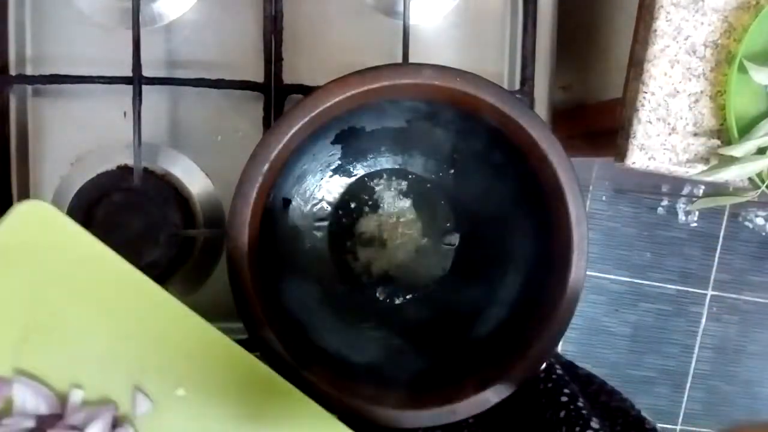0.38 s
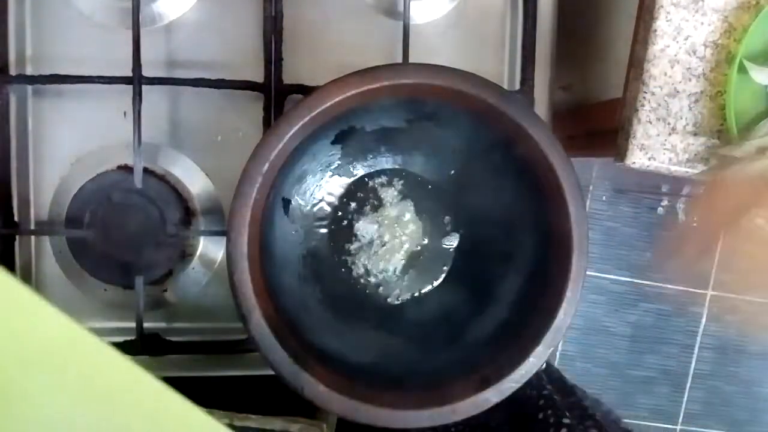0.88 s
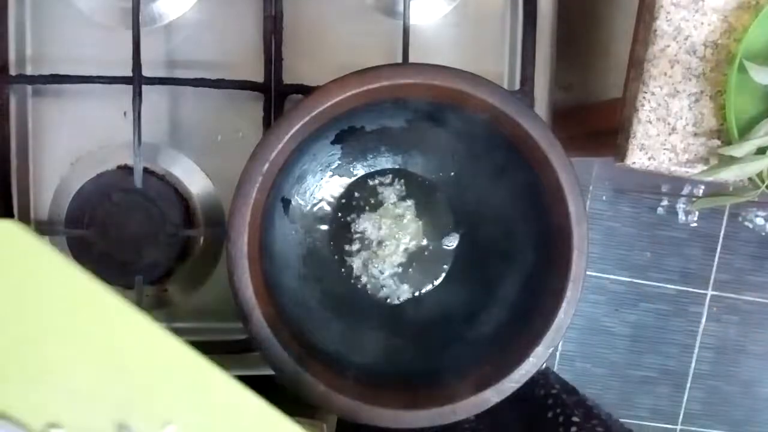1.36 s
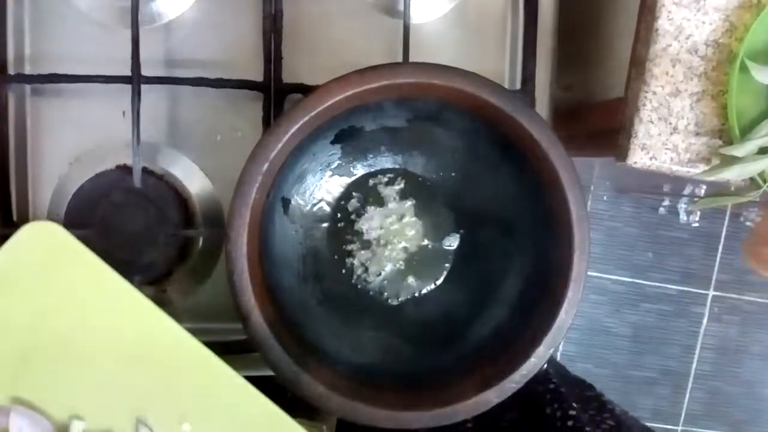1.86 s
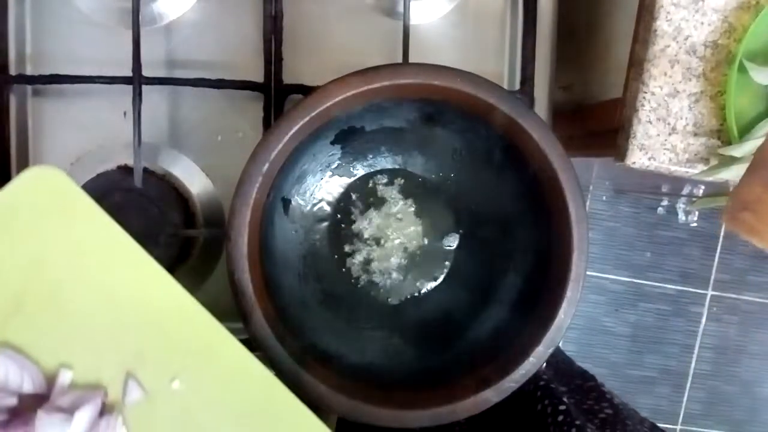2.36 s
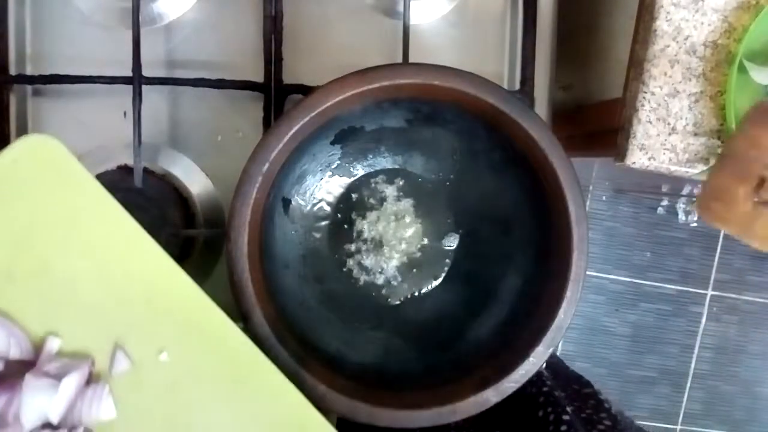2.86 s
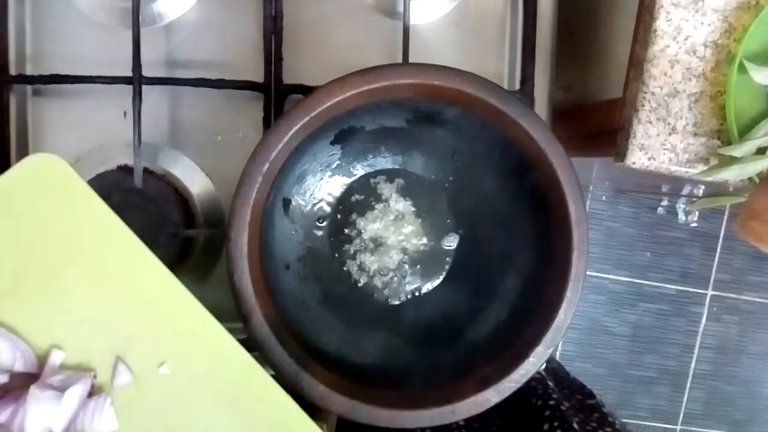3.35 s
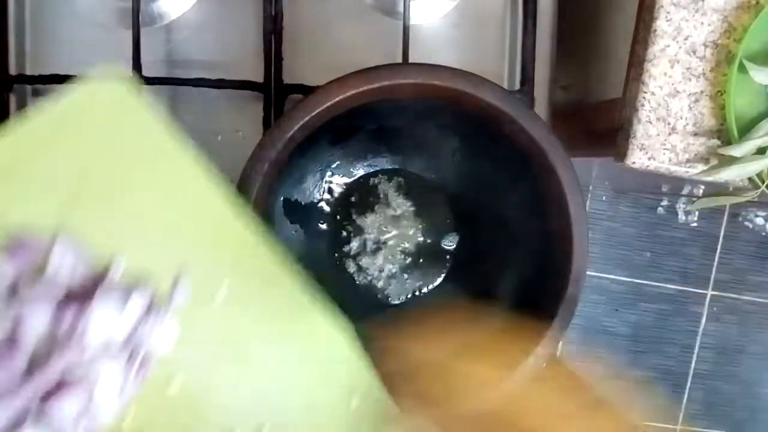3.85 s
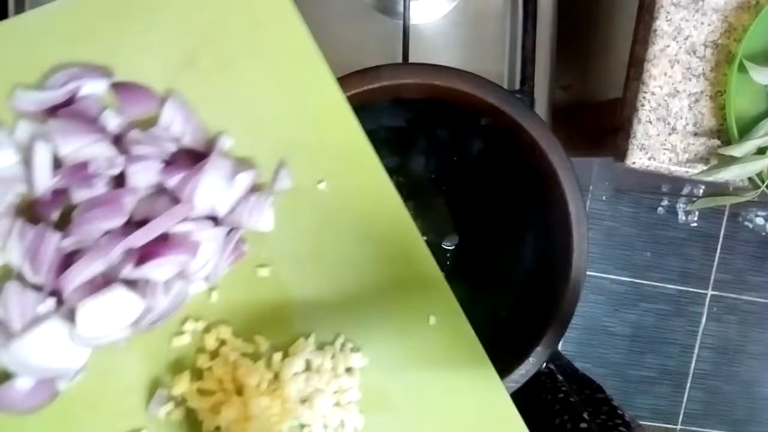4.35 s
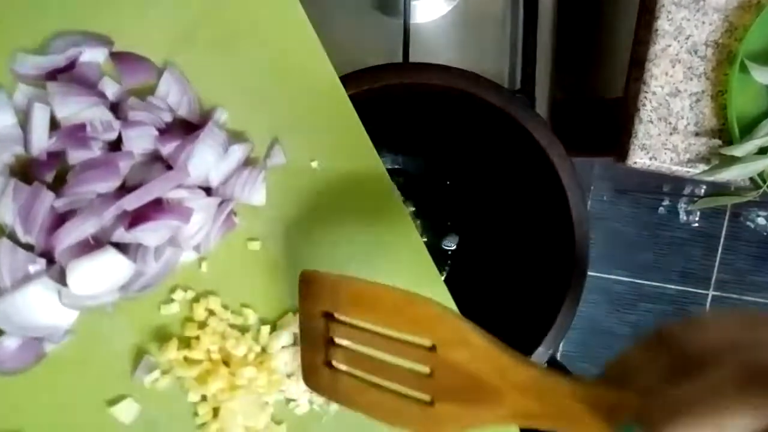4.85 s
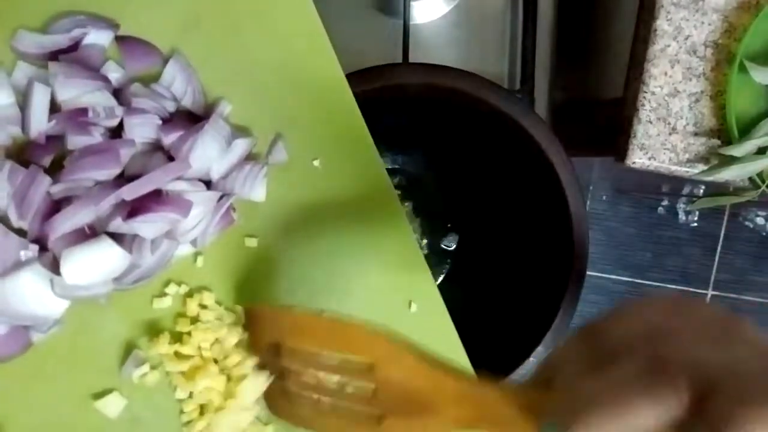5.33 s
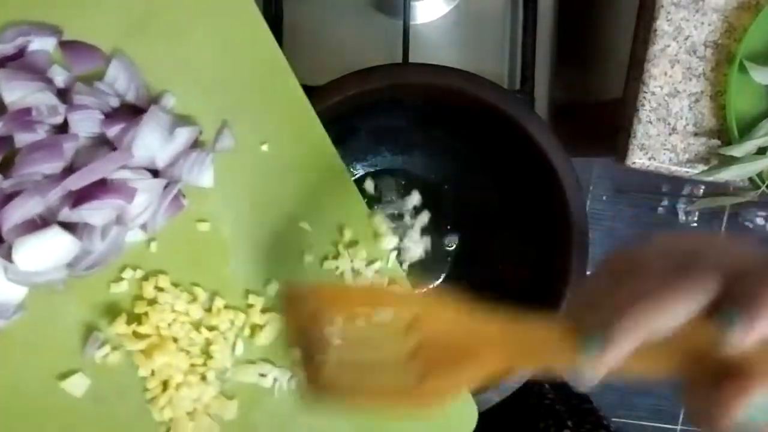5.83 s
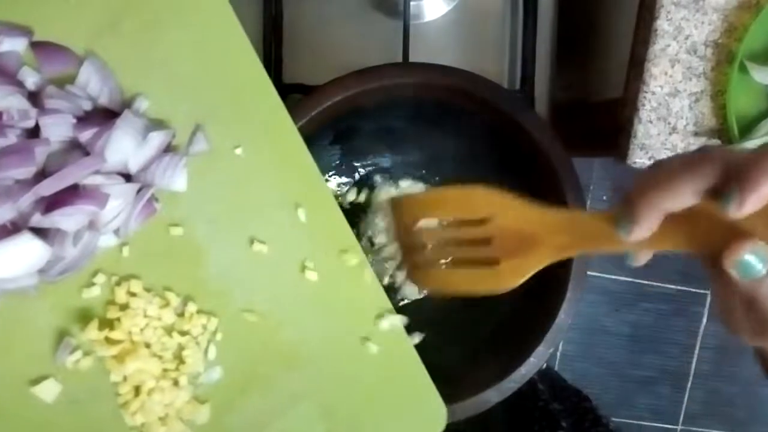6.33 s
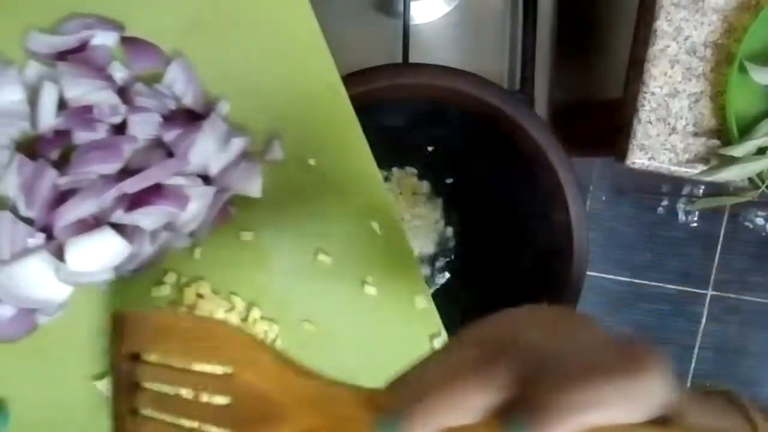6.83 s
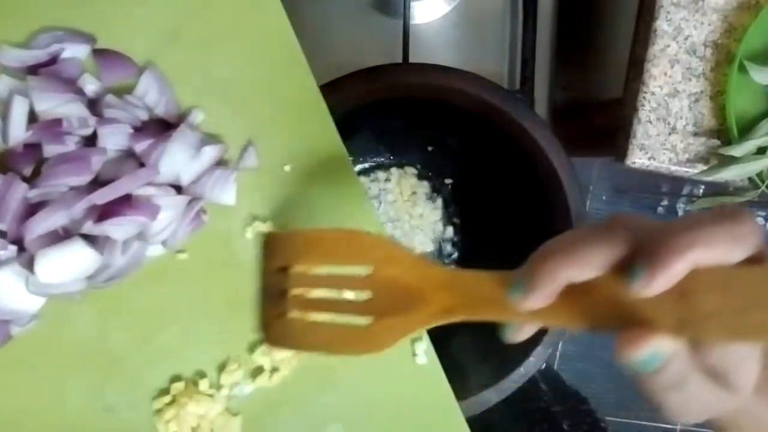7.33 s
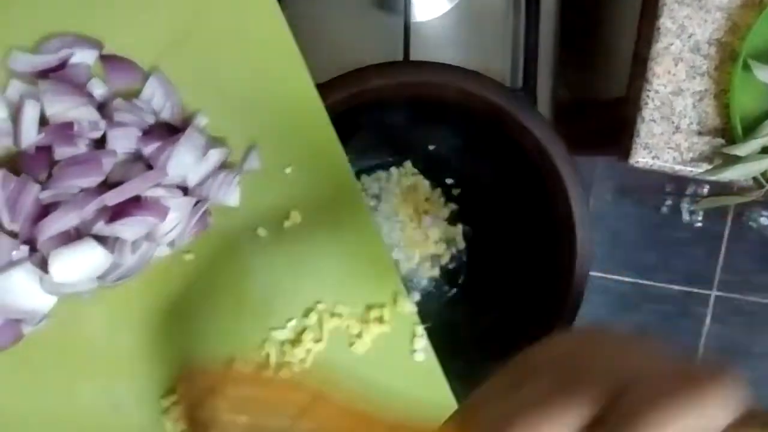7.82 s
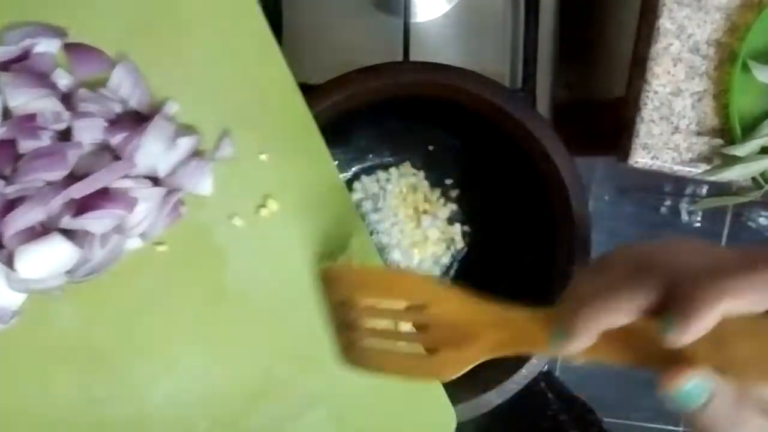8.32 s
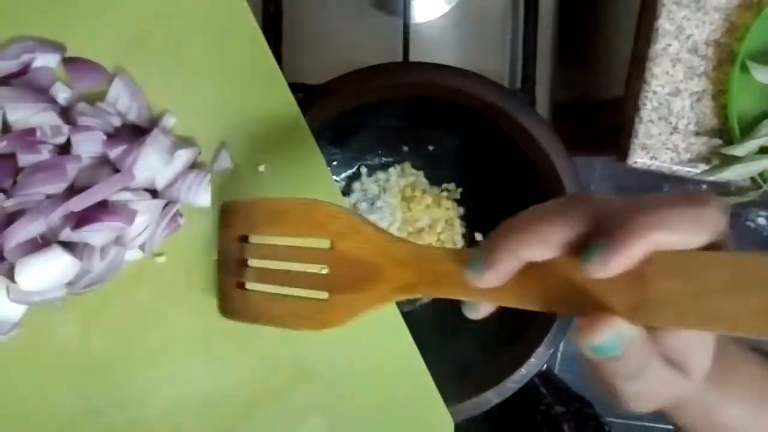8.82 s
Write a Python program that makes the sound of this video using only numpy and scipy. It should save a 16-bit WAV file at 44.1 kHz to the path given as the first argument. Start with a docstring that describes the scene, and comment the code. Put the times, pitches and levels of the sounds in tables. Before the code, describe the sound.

In a home kitchen, mustard seeds burst irregularly in hot oil, each a bright pitched pop with a crack and slight clay ring. Around six seconds wet chopped garlic and ginger drop in, and hissing sizzle surges in bursts with sharp oil spits. A wooden spatula taps and softly rubs a plastic board. Low fan and mains hum and a faint gas flame sit behind, through a close phone microphone with edgy treble.

```python
"""Mustard seeds in hot oil

Mustard seeds burst one by one in a clay pot, each a pitched steam bubble with a crack and a puff of air.
Then wet chopped garlic and ginger make the oil sizzle and spit, in swells of crackling noise.
A wooden spatula taps and rubs a plastic board. Fan tones, mains hum and a gas flame's shaped noise lie
behind, heard through a phone microphone with a sharp treble resonance."""
import sys
import numpy as np
from scipy import signal
from scipy.fft import rfft, irfft, next_fast_len
from scipy.io import wavfile
from scipy.ndimage import uniform_filter1d, map_coordinates

SR = 44100
rng = np.random.default_rng(int(sys.argv[2]) if len(sys.argv) > 2 else 0)


def how_loud(loudness_db):
    """Turn decibels into a plain amplitude multiplier (0 dB gives 1, 20 dB gives 10)."""
    steps = np.asarray(loudness_db, float) / 20
    return 10 ** steps


def log_audio(samples):
    """Write samples as a 16-bit WAV file to the path given in sys.argv[1]."""
    # one column per channel
    frames = np.atleast_2d(samples).T
    # limit to full scale, then quantise
    limited = np.clip(frames, -1, 1)
    pcm = np.round(limited * 32767).astype(np.int16)
    wavfile.write(sys.argv[1], SR, pcm)


N = 394254


def unit(x):
    """Scaled to rms 1 along time."""
    return x / np.sqrt(np.mean(x ** 2, axis=-1, keepdims=True) + 1e-20)


def along(points, hz):
    """Reads a curve of (Hz, value) points on a log frequency axis."""
    f, v = np.transpose(points)
    return np.interp(np.log(hz + 1), np.log(f + 1), v)


def wobble(rate):
    """A smooth random curve with rate knots a second."""
    knots = rng.standard_normal(int(N * rate / SR) + 4)
    return map_coordinates(knots, [np.arange(N) * rate / SR])


def filtered(x, response):
    """Passes x through a complex response of frequency."""
    n = x.shape[-1]
    m = 2 * next_fast_len(n // 2 + 4096)
    return irfft(rfft(x, m) * response(np.fft.rfftfreq(m, 1 / SR)), m)[..., :n]


def causal(gain):
    """The minimum-phase response with this gain, from its folded cepstrum."""
    c = irfft(np.log(gain + 1e-6))
    c[1:len(c) // 2] *= 2
    c[len(c) // 2 + 1:] = 0
    return np.exp(rfft(c))


def resonance(f, hz, width_hz):
    """One causal resonance of peak gain 1."""
    return 1j * f * width_hz / (hz * hz - f * f + 1j * f * width_hz + 1e-9)


def placed(times, rows):
    """Lays each row of sound down at its time in seconds."""
    at = np.round(np.asarray(times) * SR).astype(int)[:, None] + np.arange(rows.shape[1])
    return np.bincount(at.ravel(), rows.ravel(), N + SR)[:N]


def crackle(per_s, spread_db, life_s):
    """Tiny bursts at random: short puffs of noise, most small and a few large, rms 1."""
    bursts = rng.random(N) < per_s / SR
    size = bursts * how_loud(spread_db * np.minimum(rng.exponential(size=N), 4))
    puff = np.exp(-np.arange(SR // 100) / (SR * life_s))
    return unit(signal.fftconvolve(size, puff)[:N] * rng.standard_normal(N))


def swell(s, db, rise_s, fall_db_per_s):
    """Gain of one event: up 20 dB over rise_s to its top at s, then a steady fall in dB."""
    t = np.arange(N) / SR - s
    return how_loud(db + np.where(t < 0, 20 * t / max(rise_s, .002), -fall_db_per_s * t))


def together(gains):
    """Unrelated sounds add in power."""
    return np.sqrt(sum(g ** 2 for g in gains))


# Bursting seeds and drops. Each row: start in seconds, level in dB, steam bubble pitch in Hz,
# crack level in dB.
SEED_POPS = [(0.004, -22.5, 2270, -5), (0.212, -31, 5200, -10), (0.2227, -9, 3100, -16.5),
             (0.3224, -23.5, 2450, -11), (0.403, -32.5, 2920, -21), (0.4761, -18, 4070, -17),
             (0.614, -12, 2390, -14.5), (0.823, -9.5, 2100, -15.5), (0.9014, -31, 2170, -6),
             (0.996, -16.5, 2720, -20), (1.045, -14.5, 3100, -19), (1.1512, -22.5, 3000, -17),
             (1.1884, -36.5, 2640, -3), (1.266, -30.5, 2150, -9.5), (1.4343, -12, 2600, -17.5),
             (1.527, -15.5, 2900, -15), (1.5988, -29.5, 2150, -13), (1.8739, -25.5, 5830, -18),
             (1.983, -10.5, 2000, -13), (2.1219, -18, 2750, -17), (2.155, -21.5, 2680, -8),
             (2.377, -9.5, 2390, -19.5), (2.4585, -24, 2820, -25), (2.5447, -12.5, 2000, -13),
             (2.589, -18.5, 2780, -8), (2.7313, -16.5, 2220, -8.5), (2.811, -13.5, 2750, -17),
             (2.9278, -17, 2500, -16.5), (3.0394, -24.5, 5830, -22), (3.0757, -17, 1890, -15),
             (3.135, -21, 4020, -14), (3.1822, -14.5, 2620, -11.5), (3.274, -26.5, 2090, -18),
             (3.3908, -36, 2690, -22), (3.4291, -38, 4230, -3), (3.5573, -32, 4640, -12.5),
             (3.6096, -12, 2340, -9), (3.888, -28.5, 3050, -5.5), (4.0955, -18, 1980, -10),
             (4.2779, -23, 2530, -2.5), (4.3209, -16, 3030, -18), (4.616, -36, 2740, -22),
             (4.726, -10.5, 1920, -12), (5.009, -26.5, 5170, -6), (5.0493, -20, 2900, -19),
             (5.0763, -26.5, 3000, -6), (5.2776, -16.5, 2670, -14.5), (5.3257, -21.5, 2080, -13),
             (5.566, -21.5, 2400, -17), (5.6266, -23, 2760, -19), (5.6955, -16.5, 2620, -8.5),
             (5.7229, -10.5, 1900, -15.5), (5.8267, -17.5, 2550, -14.5), (5.8621, -28, 2940, -9.5),
             (5.9224, -26, 2070, -13.5), (6.1285, -17, 5000, -13), (6.1966, -22.5, 2480, -11),
             (6.292, -23, 5400, -15), (6.7101, -11, 3020, -42.5), (6.774, -12.5, 2120, -15),
             (6.8354, -17, 2130, -19), (7.2619, -18.5, 3870, -21.5), (7.385, -21, 3480, -22),
             (7.435, -19.5, 3600, -19), (7.4598, -21, 5830, -13), (7.5123, -11.5, 5830, -13),
             (7.7528, -18.5, 3760, -11.5), (7.775, -18, 3300, -20), (7.8, -17, 3900, -20),
             (7.825, -19, 3300, -20), (7.92, -25, 2200, -22), (8.158, -18, 5260, -14.5),
             (8.2476, -15, 5470, -19), (8.309, -28, 3350, -5), (8.3814, -18.5, 5300, -11)]
# Pops that throw a fine spray. Each row: time of the pop in seconds, level of its air puff in dB.
SPRAY_PUFFS = [(0.004, -5), (0.2227, -19), (0.614, -13), (0.996, -12), (1.8739, -9), (2.811, -18),
               (4.726, -10), (5.8267, -8), (6.292, -3), (6.7101, -9), (6.774, -8), (7.435, -8),
               (8.158, -10), (8.3814, 3)]


def pops():
    """Steam tears each seed: a pitched bubble and a crack above it, sputtering on as the walls answer."""
    # a few seeds only split, faintly and at random moments
    faint_count, faint_db, faint_hz, faint_crack_db = 8, -41, 3200, -10
    luck = rng.random((faint_count, 4)) - .5
    faint = [N / SR / 2, faint_db, faint_hz, faint_crack_db] + luck * [N / SR - .1, 8, 2500, 16]
    s, db, hz, crack_db = np.vstack([SEED_POPS, faint]).T[:, :, None]

    t60 = .31 + .005 * crack_db  # seconds; a harder crack sputters on longer
    air_db = -31 + 6 * rng.standard_normal(s.shape)  # the topmost puff differs every time
    for at, puff_db in SPRAY_PUFFS:
        air_db[np.argmin(abs(s - at))] = puff_db
    t = np.arange(SR * 2 // 5) / SR
    noise = rng.standard_normal((len(s), 4, len(t)))
    # each spot in the bowl drives the modes differently
    place_db = -1.5 + 3.8 * rng.standard_normal((len(s), len(POT_MODES)))

    sputter = how_loud(2.77 * unit(uniform_filter1d(noise[:, 3], size=40)))  # lumps of about a millisecond
    blast = how_loud(-4.5 - 60 * t / 0.032)
    tail = how_loud(-8 - 60 * t / np.clip(t60, .04, 1))
    opening = 1 - np.exp(-t * hz / 2.34)  # bigger bubbles take longer to open
    shape = opening * (blast + tail)
    size = np.sqrt(np.mean(shape ** 2, axis=1, keepdims=True))

    def above(f):  # little sounds below the bubble's pitch
        return 1j * f / (0.45 * hz + 1j * f)

    def crack_colour(f):
        return above(f) ** 2 * resonance(f, 3000, 11800) / (1 + (f / 13000) ** 4)

    bubble = noise[:, 0] * shape * sputter * how_loud(-60 * t / 1.2)
    bubble = unit(filtered(bubble, lambda f: above(f) * resonance(f, hz, .5 * hz) ** 2))
    crack = unit(filtered(noise[:, 1] * shape * sputter, crack_colour))
    air = noise[:, 2] * shape * how_loud(-60 * t / .5)
    air = unit(filtered(air, lambda f: resonance(f, 13000, 9000) ** 2))
    burst = size * (how_loud(-13.5) * bubble + how_loud(crack_db) * crack + how_loud(air_db) * air)
    rung = filtered(burst, lambda f: bowl(f, place_db))
    return placed(s[:, 0] - .0004, how_loud(db) * rung)


# Sharp spits of oil in the sizzle. Each row: start in seconds, level in dB, air level in dB.
OIL_SPITS = [(6.9764, -1, -24), (7.1814, -13, -23), (7.3382, -17.5, -32), (7.649, -14, -30),
             (7.8655, -14, -31), (7.9773, -16, -31), (8.042, -19, -33), (8.3714, -9, -20),
             (8.4407, -7, -38), (8.5054, -20, -12), (8.706, -2, -27), (8.762, 0, -14), (8.8458, 8, -32),
             (8.8524, -7, -40), (8.8894, -14, -36)]


def spits():
    """A flung droplet of oil: one sharp snap, some with much top, and a short spray after it."""
    s, db, air_db = np.transpose(OIL_SPITS)[:, :, None]
    t = np.arange(SR // 50) / SR
    spray = 0.064 * rng.standard_normal((len(s), len(t))) * how_loud(-60 * t / .008)
    snap = (t == 0) + spray

    def colour(f):
        return resonance(f, 9800, 6000) ** 2 - how_loud(air_db + 19) * resonance(f, 12000, 9000) ** 2

    return placed(s[:, 0], how_loud(db + 7.5) * filtered(snap, colour))


# Spectrum of the fine fizz. Each row: frequency in Hz, relative gain in dB.
FIZZ_COLOUR = [(800, -43), (2000, -26.5), (4000, -9.5), (6000, -0.5), (10000, 5.5), (16000, 1)]


def fine_fizz():
    """Many tiny bursts, duller than the hiss they sit in, rms 1."""
    bursts = crackle(per_s=1500, spread_db=3.3, life_s=.001)
    bursts = unit(filtered(bursts, lambda f: resonance(f, 5470, 6300) ** 2))
    fizz = bursts + 1.37 * rng.standard_normal(N)
    return unit(filtered(fizz, lambda f: how_loud(along(FIZZ_COLOUR, f))))


# Spectrum of the coarser bubbling. Each row: frequency in Hz, relative gain in dB.
BUBBLING_COLOUR = [(500, -23), (1200, -5), (2200, -4.5), (3500, 2.5), (5000, -3), (9000, -11.5)]


def coarse_bubbling():
    """Fewer and longer bursts, more alike in size, over noise, rms 1."""
    bursts = crackle(per_s=900, spread_db=0.5, life_s=0.0031)
    bubbling = bursts + 0.87 * rng.standard_normal(N)
    return unit(filtered(bubbling, lambda f: how_loud(along(BUBBLING_COLOUR, f))))


# Faint fizz under the seeds. Each row: time in seconds, level in dB.
SEED_SIMMER = [(0.0, -48), (0.82, -55.5), (1.07, -48), (1.25, -56.5), (1.84, -53.5), (2.99, -50),
               (3.68, -51), (4.76, -55.5), (5.55, -50.5), (5.9, -53)]
# Wet food lands in the oil. Each row: time in seconds, steam level in dB, steam fade in dB per second.
FOOD_LOADS = [(5.98, -32, 17), (6.49, -25, 15), (7.757, -25.5, 7)]
# Short swells of fizz and bubbling; the first is a faint low noise at the start. Each row: time of the
# top in seconds, fizz level in dB, swell time in seconds, bubbling level in dB against the fizz.
SHORT_SWELLS = [(0.0, -60, .01, 14), (5.83, -43, .03, -1), (6.035, -34, .01, -20), (6.13, -31.5, .05, -11),
                (6.3, -37, .05, -12), (6.41, -33, .06, -14), (6.49, -33, .05, -12), (6.63, -31.5, .15, -8),
                (6.72, -32.5, .05, -9), (6.79, -33, .05, -7), (6.86, -32, .1, -8), (6.953, -27, .004, -19),
                (7.09, -34, .01, -17), (7.15, -30, .08, -17), (7.35, -32, .04, -17), (7.46, -31, .02, -24),
                (7.513, -28, .003, -26), (7.78, -32.5, .03, -5), (7.87, -33, .1, -9), (7.99, -32, .1, -14),
                (8.07, -31.5, .1, -14), (8.25, -30, .01, -20), (8.39, -30.5, .04, -12),
                (8.44, -33, .03, -12), (8.52, -35, .03, -8), (8.64, -33, .06, -9), (8.7, -27, .1, -12),
                (8.765, -27.5, .04, -10), (8.85, -28, .01, -9), (8.92, -34, .04, -9)]


def frying():
    """Fizz, bubbling and steam of frying, faint under the seeds, strong under wet food, with short swells."""
    land_s, fry_fall_db_per_s, swell_fall_db_per_s = .018, 4.2, 110
    fizz_db, bubbling_db = -8, -20  # steady frying against the landing level of the load
    fry = together(swell(s, db, land_s, fry_fall_db_per_s) for s, db, _ in FOOD_LOADS)
    steam = together(swell(s, db, land_s, fall) for s, db, fall in FOOD_LOADS)
    swells = [swell(s, db, rise_s, swell_fall_db_per_s) for s, db, rise_s, _ in SHORT_SWELLS]
    simmer_s, simmer_db = np.transpose(SEED_SIMMER)
    simmer = how_loud(np.interp(np.arange(N) / SR, simmer_s, simmer_db))

    fizz = together([simmer, how_loud(fizz_db) * fry] + swells)
    fizz = fizz * how_loud(1.1 * wobble(35) + 1.1 * wobble(120))
    swell_bubbling = [how_loud(row[3]) * gain for row, gain in zip(SHORT_SWELLS, swells)]
    bubbling = together([how_loud(bubbling_db) * fry] + swell_bubbling) * how_loud(0.83 * wobble(25))
    hiss = filtered(rng.standard_normal(N), lambda f: resonance(f, 11700, 13000) ** 2)
    return steam * how_loud(1.5 * wobble(12)) * hiss + fizz * fine_fizz() + bubbling * coarse_bubbling()


# Ringing modes of the clay pot. Each row: frequency in Hz, width in Hz, level in dB before the
# drive of the place is added.
POT_MODES = [(1725, 20, -9.5), (1834, 13, -23), (1887, 38, -1), (2088, 36, -4.5), (2210, 63, 1),
             (2580, 20, -9.5), (2874, 23, 0), (2910, 60, 4.5), (3740, 29, -10), (4460, 33, 4.5),
             (5380, 46, 2), (6070, 29, 4.5), (6580, 45, 2)]


def bowl(f, place_db):
    """The clay bowl rings a little on top of whatever bursts in it."""
    ring = sum(how_loud(db + place_db[..., [k]]) * resonance(f, hz, width)
               for k, (hz, width, db) in enumerate(POT_MODES))
    return 1 + ring


def pot(x):
    """Sound from all over the oil drives every mode by the same 3 dB less."""
    return filtered(x, lambda f: bowl(f, np.full(len(POT_MODES), -3)))


# Modes of the plastic board. Each row: frequency in Hz, width in Hz, level in dB.
BOARD_MODES = [(194, 144, -3), (420, 68, 1), (584, 180, -5), (880, 350, -4.5), (1450, 460, -3)]


def board(f):
    """The thin board as a sum of resonances of alternating sign."""
    return sum((-1) ** k * how_loud(db) * resonance(f, hz, width)
               for k, (hz, width, db) in enumerate(BOARD_MODES))


# Spatula taps. Each row: start in seconds, level in dB, contact time in seconds.
SPATULA_KNOCKS = [(6.059, -35, 0.00075), (8.061, -19.5, 0.00019)]


def knocks():
    """Wood taps the board with a smooth push and a rattle; a longer contact makes a duller tap."""
    s, db, contact = np.transpose(SPATULA_KNOCKS)[:, :, None]
    t = np.arange(SR // 20) / SR
    push = np.exp(-(t / contact - 2) ** 2)
    rattle = 6e-5 / contact * rng.standard_normal((len(s), len(t))) * how_loud(-60 * t / 0.099)
    return filtered(placed(s[:, 0], how_loud(db + 5) * (push + rattle)), board)


# Spatula drags, and one very short rub or knock at 8.14. Each row: start in seconds, length in seconds,
# level in dB.
SPATULA_RUBS = [(0.05, .14, -56), (7.13, .42, -51), (8.14, .015, -42.5), (8.19, .2, -56)]


def rubs():
    """Wood on the board as crackling noise that sags slowly, then stops fast at the end of its length."""
    rise_s, sag_db_per_s, stop_db_per_s = .03, 12, 300
    gain = 0
    for start, length, db in SPATULA_RUBS:
        onset = swell(start, db, rise_s, sag_db_per_s)
        stop = swell(start + length, db, 99, stop_db_per_s)
        gain = gain + np.minimum(onset, stop)
    friction = crackle(per_s=900, spread_db=1.5, life_s=.004)
    # soft rubbing stirs the low modes
    return gain * unit(filtered(friction, lambda f: board(f) * resonance(f, 564, 660) ** 2))


# Mains and fan tones. Each row: frequency in Hz, rms level in dB, wander in Hz.
HUM_TONES = [(50, -68, 0.16), (90.1, -60, 0.81), (100.5, -57.5, 0.26), (134.1, -61.5, 1.502)]


def mains_and_fan():
    """Sines at mains and fan pitches, slightly unsteady in level and frequency."""
    total = 0
    for hz, db, wander_hz in HUM_TONES:
        phase = 2 * np.pi * np.cumsum(hz + wander_hz * wobble(3)) / SR
        total = total + np.sqrt(2) * how_loud(db + 0.52 * wobble(4)) * np.sin(phase)
    return total


# Air tones of the fan. Each row: frequency in Hz, resonance width in Hz, relative level in dB.
FAN_AIR = [(215, 48, -3.5), (317, 68, -3.5), (351, 9.9, -4.5), (578.5, 21, 3.5)]


def fan_air():
    """Air noise gathered into narrow bands around the fan's air tones."""
    def bands(f):
        return sum(how_loud(db) * abs(resonance(f, hz, width)) ** 2 for hz, width, db in FAN_AIR)

    return how_loud(-58) * unit(filtered(rng.standard_normal(N), bands))


# Spectrum of the gas flame. Each row: frequency in Hz, relative level in dB per Hz.
FLAME_COLOUR = [(22, -8), (45, 0), (90, 9.5), (170, 0.5), (400, 2.5), (700, 0), (1300, -4), (2000, -8.5),
                (5000, -11), (16000, -9)]


def gas_flame():
    """The soft roar of the gas flame: shaped noise, gently unsteady."""
    roar = unit(filtered(rng.standard_normal(N), lambda f: how_loud(along(FLAME_COLOUR, f))))
    return how_loud(-52.5 + .4 * wobble(3)) * roar


def scene():
    """Everything in the pot rings the pot; board and kitchen sound around it."""
    in_pot = pops() + pot(spits() + frying())  # pops already ring the bowl one by one
    on_board = knocks() + rubs()
    kitchen = mains_and_fan() + fan_air() + gas_flame()
    return (in_pot + on_board + kitchen)[None]


# Response of the microphone. Each row: frequency in Hz, gain in dB.
MICROPHONE_GAIN = [(1000, 0.5), (4500, 1), (5500, 4), (6400, 8.5), (7000, 1.5), (7700, -10.5), (9000, -20),
                   (11000, -27), (13800, -35), (14700, -17), (15400, -21)]


def phone_microphone(dry):
    """The port resonates near 6 kHz and little passes above; the microphone's own faint hiss rides along."""
    top_hz = 15600
    hiss = filtered(rng.standard_normal(N), lambda f: abs(resonance(f, 11700, 8300)) ** 2)
    sound = dry + how_loud(-45.5) * hiss
    return filtered(sound, lambda f: causal(how_loud(along(MICROPHONE_GAIN, f)) * (f < top_hz)))


def band_limit(x):
    """A steep low-pass at the top of the band."""
    return signal.sosfilt(signal.butter(12, 16870, fs=SR, output="sos"), x)


def record(dry):
    """The phone microphone hears the whole kitchen."""
    mix = phone_microphone(dry)
    return band_limit(mix)


dry = scene()
out = record(dry)
log_audio(out)
```